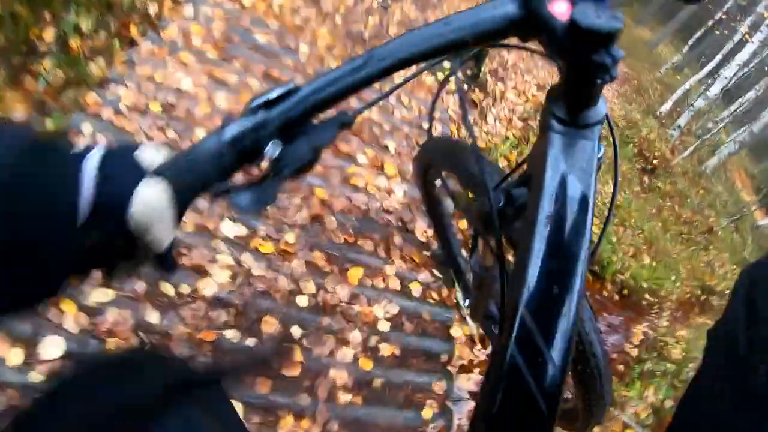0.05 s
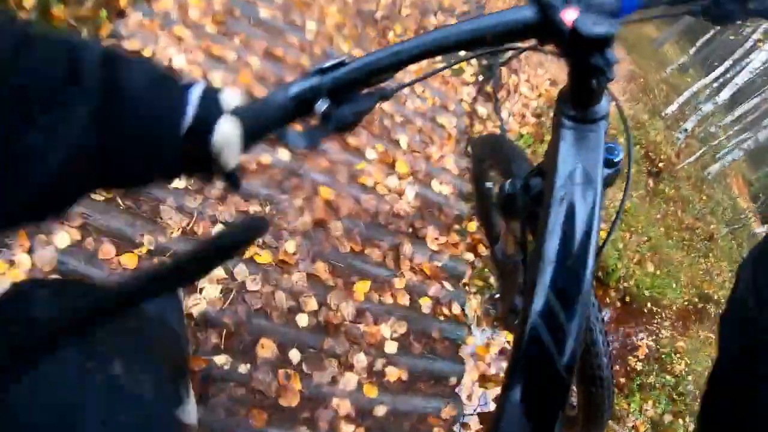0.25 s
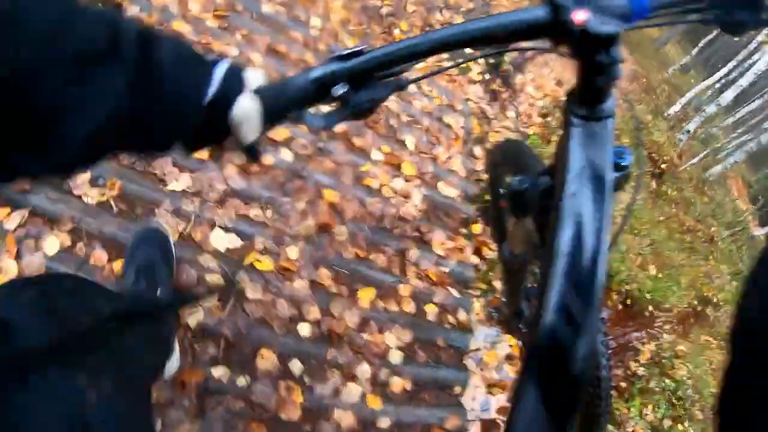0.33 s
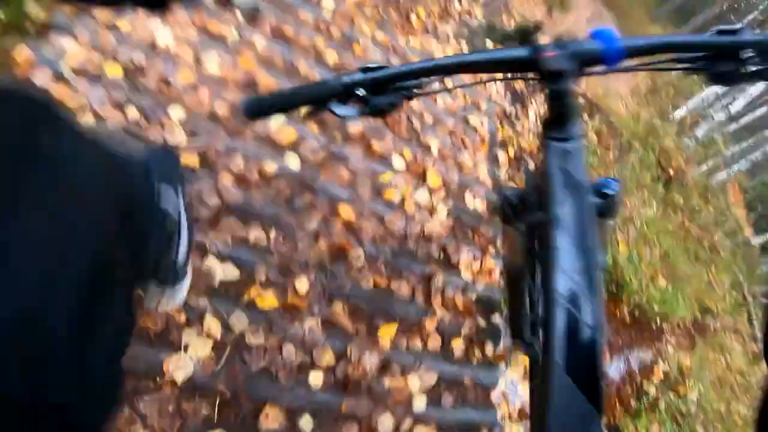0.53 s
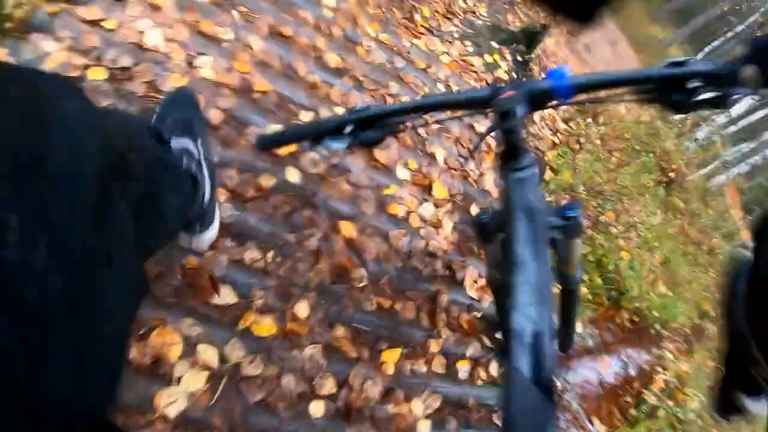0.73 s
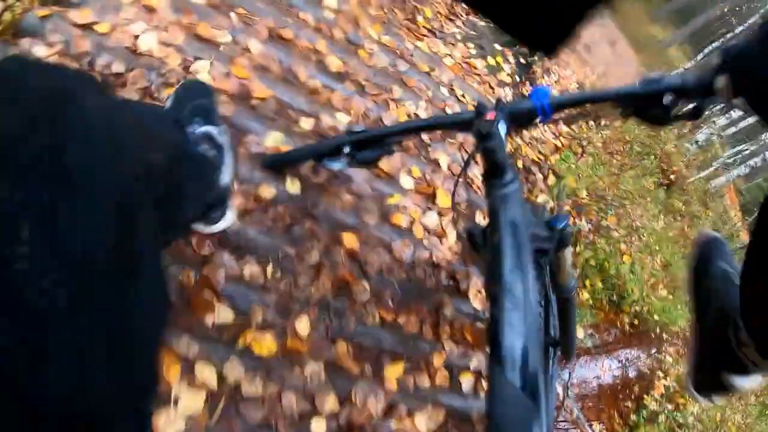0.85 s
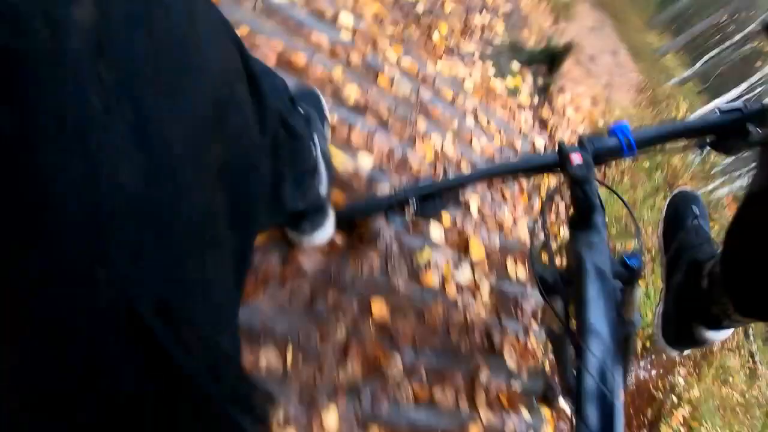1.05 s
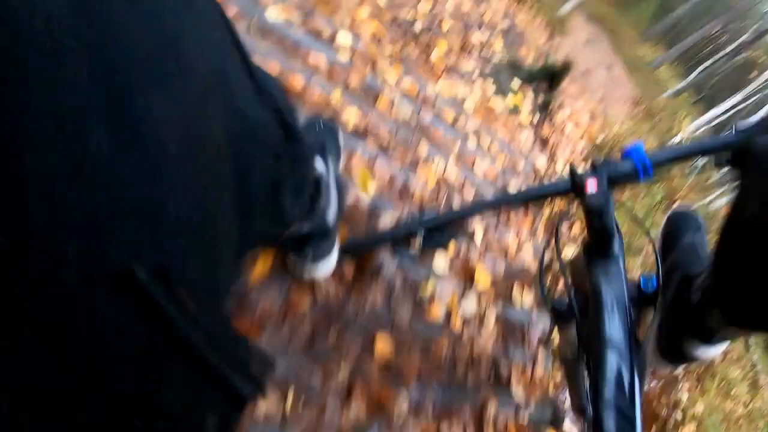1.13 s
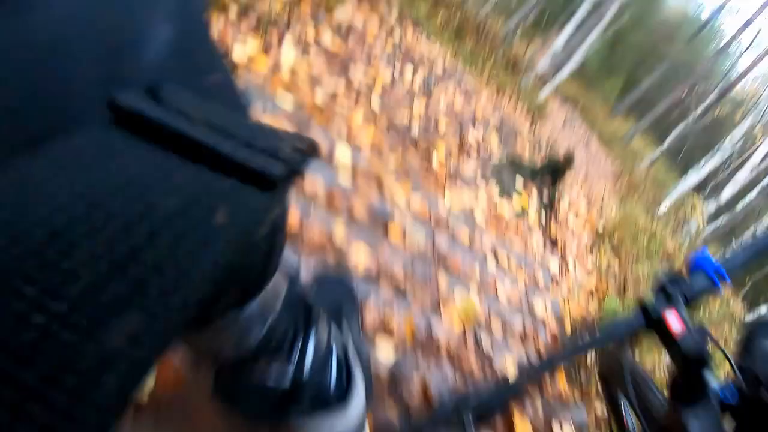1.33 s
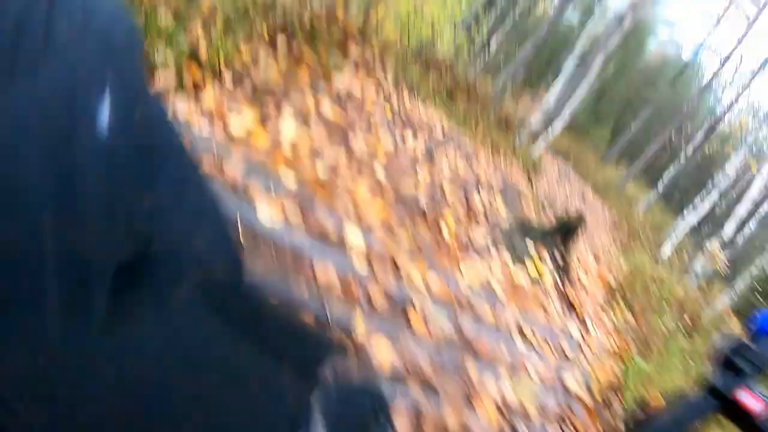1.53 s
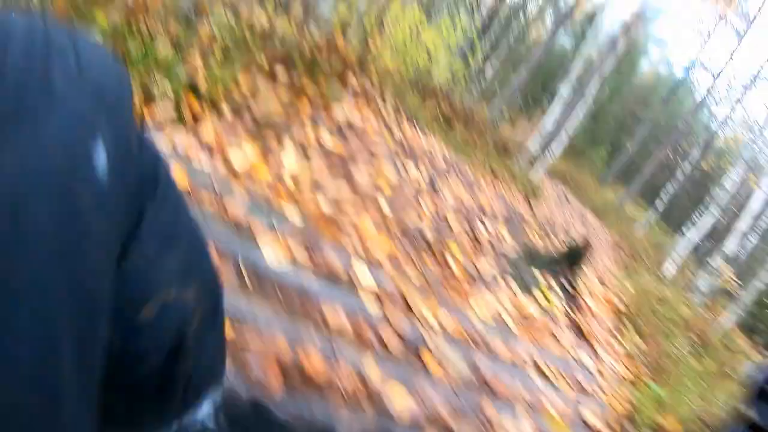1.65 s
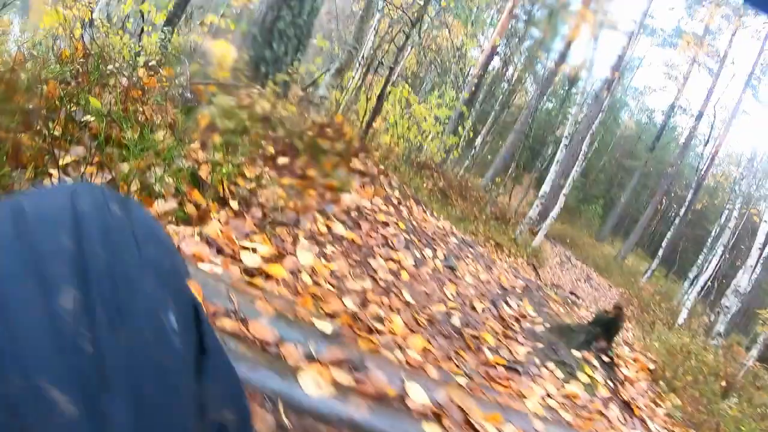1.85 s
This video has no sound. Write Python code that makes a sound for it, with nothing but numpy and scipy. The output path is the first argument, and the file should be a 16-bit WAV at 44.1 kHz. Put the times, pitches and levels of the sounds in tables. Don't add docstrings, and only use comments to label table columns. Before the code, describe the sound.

Deep, slow thuds and wooden knocks of a bike crossing leaf-covered slats, with crunch and brake rub

```python
import sys
import numpy as np
from scipy import signal
from scipy.fft import rfft, irfft, next_fast_len
from scipy.io import wavfile
from scipy.ndimage import uniform_filter1d, map_coordinates

SR = 44100
rng = np.random.default_rng(int(sys.argv[2]) if len(sys.argv) > 2 else 0)


def wav_record(signal):
    frames = np.transpose(np.atleast_2d(signal))
    bounded = np.clip(frames, -1, 1)
    quanta = np.round(bounded * 32767).astype(np.int16)
    wavfile.write(sys.argv[1], SR, quanta)


def level_to_linear(level):
    exponent = np.asarray(level, float) / 20
    return 10 ** exponent


N = 83790


def unit(x):
    return x / np.sqrt(np.mean(x ** 2) + 1e-20)


def along(points, hz):
    f, v = np.transpose(points)
    return np.interp(np.log(hz + 1), np.log(f + 1), v)


def level(rows):
    s, db = np.transpose(rows)
    return level_to_linear(np.interp(np.arange(N) / SR, s, db, left=-120))


def wobble(rate):
    knots = rng.standard_normal(int(N * rate / SR) + 4)
    return map_coordinates(knots, [np.arange(N) * rate / SR])


def filtered(x, response):
    m = next_fast_len(N + SR // 2)
    spectrum = rfft(x, m) * response(np.fft.rfftfreq(m, 1 / SR))
    return irfft(spectrum, m)[..., :N]


def body(x, modes, edge_hz):
    def response(f):
        peaks = 0
        for k, (centre, width, db) in enumerate(modes):
            peak = 1j * f * width / (centre * centre - f * f + 1j * f * width)
            peaks = peaks + (-1) ** k * level_to_linear(db) * peak
        dull = edge_hz ** 2 / (edge_hz ** 2 - f * f + 1.2j * f * edge_hz)
        return peaks * dull ** 2
    return filtered(x, response)


def grains(per_s, spread_db, noise):
    when, size, hiss = rng.random(N), rng.exponential(size=N), rng.standard_normal(N)
    taps = (when < per_s / SR) * level_to_linear(spread_db * size) * np.sign(hiss)
    return unit(unit(taps) + noise * hiss)


def even(x, span_s):
    span = round(span_s * SR)
    power = np.abs(uniform_filter1d(uniform_filter1d(unit(x) ** 2, span), span))
    return unit(x / (power + .05) ** .35)


def shaking():
    # (time [s], level [dB])
    shake_level = [(0.0, -20.5), (0.074, -31), (0.39, -15), (0.412, -25), (0.666, -15), (0.756, -16.5),
                   (0.82, -32.5), (0.92, -25), (0.984, -12), (1.152, -18.5), (1.168, -17.5), (1.312, -24.5),
                   (1.338, -23), (1.524, -31), (1.544, -27.5), (1.582, -26.5), (1.772, -33.5), (1.9, -40.5)]
    # (frequency [Hz], level [dB per Hz])
    sway_colour = [(7.1, -55), (12, -9), (26, 0), (48, 3.5), (123, -3), (160, -11), (210, -96), (350, -120)]
    # (time [s], level [dB], pitch [Hz], direction [+/-])
    thumps = [(0.182, -18.5, 137, .9), (0.29, -14, 98, -0.8), (0.374, -14, 95, -0.75),
              (0.411, -7.5, 61, -0.84), (0.448, -5.5, 110, -1.1), (.462, -7, 71, -0.75),
              (.482, -10, 24.6, 0.94), (.545, -10, 24, -0.42), (.606, -13, 140, 0.96),
              (.648, -11, 15.3, 0.52), (.692, -13, 28, -0.72), (0.748, -11, 18.7, 0.99),
              (0.963, -17, 103, -0.79), (.973, -7.5, 55, -0.88), (0.987, -5.5, 19.2, 0.85),
              (1.032, -12, 78, 0.79), (1.08, -17, 63, 0.83), (1.16, -20, 66, -0.7),
              (1.198, -7.5, 122, -0.47), (1.255, -17.5, 16, 0.6), (1.336, -10.5, 33.3, 0.74),
              (1.424, -20.5, 21, 0.82), (1.544, -16, 93, -0.8), (1.6, -21.5, 15, .9),
              (1.645, -24.5, 75, -0.63), (1.754, -27, 15, 1)]
    thump_cycles = 1.32
    sway = even(filtered(rng.standard_normal(N), lambda hz: level_to_linear(along(sway_colour, hz))), span_s=0.013)
    out = level(shake_level) * level_to_linear(-5.5 + 0.28 * wobble(17.0)) * sway
    t = np.arange(N) / SR
    for s, db, hz, way in thumps:
        cycles = np.clip(t - s, 0, None) * hz
        out = out + way * level_to_linear(db) * np.sin(2 * np.pi * cycles) * np.exp(-(cycles / thump_cycles) ** 2)
    return out


def rolling():
    # (time [s], level [dB])
    roll_level = [(0, -35), (.042, -42), (.34, -32.5), (.4, -25.5), (.448, -23), (.554, -31.5), (.66, -32),
                  (.7, -23.5), (.756, -26.5), (.804, -36), (.96, -29.5), (.988, -25), (1.142, -23),
                  (1.168, -44), (1.274, -35), (1.5, -43.5), (1.73, -42), (1.81, -39), (1.9, -42)]
    # (frequency [Hz], level [dB per Hz])
    leaves = [(130, -71), (220, -2.5), (300, -6.5), (419, -6.5), (476, -7), (581, -9.5), (1200, -12),
              (1360, -23.5), (3600, -49.5), (4680, -61), (7920, -120)]
    # (frequency [Hz], level [dB per Hz])
    rustle = [(250, -31), (520, -5), (1150, -3.5), (1600, -18.5), (3100, -34), (4600, -70)]
    # (time [s], share of rustle [0-1])
    loose_share = [
        (1.45, 0.1),
        (1.58, 0.4),
        (1.72, 0.36),
        (1.82, 0.81),
    ]
    swells = level_to_linear(.7 * wobble(22) + 1.5 * wobble(70))
    crush = swells * grains(per_s=1300, spread_db=2, noise=.9)
    heavy = even(filtered(crush, lambda hz: level_to_linear(along(leaves, hz))), span_s=0.014)
    thin = even(filtered(crush, lambda hz: level_to_linear(along(rustle, hz))), span_s=0.014)
    loose = np.clip(np.interp(np.arange(N) / SR, *np.transpose(loose_share)), 0, 1)
    return level_to_linear(-1.0) * level(roll_level) * ((1 - loose) * heavy + loose * thin)


def tyre():
    # (time [s], level [dB])
    drum_level = [(0, -44), (.17, -34.5), (.2, -29.5), (.25, -42), (.345, -22.5), (.42, -19.5), (.545, -17),
                  (.575, -21.5), (.62, -19.5), (.675, -23.5), (.715, -22.5), (.76, -35.5), (.98, -26.5),
                  (1.06, -29.5), (1.12, -37), (1.21, -24.5), (1.34, -34), (1.42, -42.5), (1.9, -54)]
    # (frequency [Hz], width [Hz], level [dB])
    tyre_modes = [(201.9, 13.8, 1.5), (167.3, 71.3, -4), (294, 16, -17)]
    knobs = grains(per_s=210, spread_db=2.5, noise=0.19)
    return level(drum_level) * even(body(knobs, tyre_modes, edge_hz=374), span_s=0.096)


def pings():
    # (time [s], peak level [dB], pitch [Hz], rise [s])
    struck = [(.2, -36, 325, 0.0074), (.309, -30, 513, 0.0037), (.34, -22.5, 403, 0.0049),
              (.378, -26, 543, 0.0022), (.41, -25.5, 1088, 0.0087), (.414, -35.5, 2080, 0.0052),
              (.432, -22.5, 620.6, 0.015), (.44, -23, 1285, 0.0057), (.468, -23.5, 1115, 0.0077),
              (.575, -33.5, 804, .012), (.607, -33, 714, 0.0057), (.625, -31, 557, 0.009),
              (.645, -38.5, 2100, 0.0049), (.684, -24, 1217, 0.0057), (.685, -19, 362.7, 0.015),
              (.691, -26, 2094, 0.0023), (.712, -37, 2140, 0.0018), (.726, -26, 2117, 0.0046),
              (.744, -28, 2150, 0.0018), (.7345, -9.5, 551, .0025), (.7355, -11.5, 1247, 0.0018),
              (.736, -15.5, 1470, 0.0012), (.736, -14, 843, 0.0016), (.742, -24, 1250, 0.0017),
              (.833, -36, 800, 0.0053), (.906, -27.5, 580, 0.0017), (.943, -41, 620, 0.0025),
              (.973, -19.5, 1192, .003), (.972, -30.5, 1850, 0.0021), (1.006, -23, 923, 0.0021),
              (1.054, -22.5, 866, 0.0024), (1.148, -16.5, 458, 0.0064), (1.187, -25.5, 1040, .004),
              (1.188, -14, 484, 0.0034), (1.24, -35.5, 1260, 0.0024), (1.276, -23.5, 1020, 0.0019),
              (1.314, -19.5, 506, 0.0042), (1.329, -29, 960, 0.0008), (1.329, -23.5, 493, .002),
              (1.035, -23.5, 843, 0.0027), (1.1, -22.5, 1176, 0.0025), (1.44, -40.5, 599, 0.013),
              (.99, -24.5, 287, 0.017), (.47, -20.5, 434.3, 0.0078), (.075, -37, 329, 0.011),
              (1.395, -46, 1090, 0.0029), (1.47, -57, 2920, 0.0013), (1.612, -54, 2840, 0.0026),
              (1.643, -38, 934, 0.0051), (1.79, -47, 1600, 0.0084)]
    s, db, hz, rise = np.transpose(struck)[..., None]
    since = np.clip(np.arange(N) / SR - s, 0, .4)
    swell = since / np.maximum(rise, .001)
    notes = level_to_linear(db) * swell * np.exp(1 - swell) * np.sin(2 * np.pi * hz * since)
    return np.sum(notes, axis=0)


def knocks():
    # (time [s], peak level [dB], length [s])
    knock_times = [(0.308, -18, 0.0055), (0.338, -17, 0.006), (0.385, -14, 0.0089), (0.427, -8, 0.016),
                   (0.467, -12, 0.013), (0.685, -12, 0.029), (0.73, -6.5, 0.0083), (0.972, -5, 0.0058),
                   (0.999, -27, 0.0064), (1.047, -12, 0.011), (1.137, -19, 0.016), (1.178, -15.5, 0.015),
                   (1.225, -19, 0.016), (1.271, -20, 0.0078), (1.3, -24, 0.0088), (1.335, -24.5, 0.013),
                   (1.376, -29, 0.013), (1.552, -31, 0.011), (1.649, -26.5, 0.012), (1.775, -34, 0.022)]
    # (frequency [Hz], width [Hz], level [dB])
    frame_modes = [(357.6, 24, 9), (430, 470, -2), (621, 98, 3), (764, 420, -17), (1075, 87, -1.5),
                   (1174, 113, -5), (1720, 560, -61)]
    rise_share, knock_db = 0.58, -14.5
    t, shape = np.arange(N) / SR, np.zeros(N)
    for s, db, length in knock_times:
        since, fade = np.clip(t - s, 0, None), max(length, .002)
        burst = (1 - np.exp(-since / (rise_share * fade))) * np.exp(-since / fade)
        shape = shape + level_to_linear(db + knock_db) * burst / burst.max()
    taps = np.sign(rng.standard_normal(N))

    def ring(x):
        return body(body(x, frame_modes, edge_hz=1580), [(840, 8100, 0)], edge_hz=3450)

    return ring(shape * taps) / np.std(ring(taps))


def chain():
    # (time [s], level [dB])
    chatter_level = [(.39, -77), (.418, -38.5), (.48, -46), (.54, -84), (.61, -55), (.65, -46),
                     (.67, -42.5), (.695, -33.5), (.73, -28), (.78, -44.5), (.96, -52.5), (1.03, -34.5),
                     (1.06, -29.5), (1.13, -39), (1.22, -60), (1.26, -47), (1.33, -46.5), (1.6, -67)]
    # (frequency [Hz], width [Hz], level [dB])
    chain_modes = [(2037, 73, -6), (2150, 200, -17.5), (2710, 140, -24), (2954, 340, -26)]
    slaps = level_to_linear(2 * wobble(60)) * grains(per_s=700, spread_db=2, noise=.8)
    return level_to_linear(-5.5) * level(chatter_level) * even(body(slaps, chain_modes, edge_hz=4000), span_s=0.032)


def snaps():
    # (time [s], peak level [dB])
    blow_times = [
        (0.7378, 2.5),
        (.9725, -18.5),
        (1.192, -40),
        (1.243, -43),
        (1.278, -38),
        (1.332, -30),
        (1.397, -31),
        (1.427, -29),
        (1.152, -48),
    ]
    # (frequency [Hz], width [Hz], level [dB])
    case_modes = [(560, 280, 4.5), (1200, 710, -5.5), (1600, 130, -28), (2326, 143, 5)]
    blows = np.zeros(N)
    for s, db in blow_times:
        blows[round(s * SR)] = level_to_linear(db + 17.5)
    return body(blows, case_modes, edge_hz=2220)


def brake():
    # (time [s], level [dB])
    rub_level = [(1.1, -52), (1.155, -27.5), (1.19, -28), (1.235, -36.5), (1.29, -30), (1.325, -22.5),
                 (1.35, -35), (1.4, -32), (1.47, -43.5), (1.5, -33.5), (1.53, -43), (1.56, -32.5),
                 (1.62, -39.5), (1.67, -51), (1.73, -48), (1.76, -50), (1.82, -38.5), (1.88, -60)]
    # (frequency [Hz], width [Hz], level [dB])
    rotor_modes = [(295, 16, -1.5), (422, 77, -1.5), (473, 36, 3.5), (1005, 29, -8.5), (2070, 40, -27),
                   (2850, 250, -31)]
    rub = level_to_linear(2 * wobble(30)) * rng.standard_normal(N)
    ringing = body(body(rub, rotor_modes, edge_hz=6700), [(600, 1220, 0)], edge_hz=5100)
    return level_to_linear(1.0) * level(rub_level) * even(ringing, span_s=0.026)


def channel_difference(mid):
    # (time [s], level [dB])
    opening = [(0, -23), (.3, -27), (.34, -3), (.41, -1), (.44, -15), (.5, 2), (.57, -15), (.62, -24),
               (.66, 5.5), (.8, 3), (.85, -26), (1.32, -30), (1.36, 8.5), (1.6, 3.5), (1.66, -7),
               (1.85, -20), (1.89, 4)]
    # (frequency [Hz], side minus mid [dB])
    turning = [(60, -41), (300, -30), (1000, -19.5), (2200, -12.5), (3200, -15), (5000, -23)]
    # (frequency [Hz], side minus mid [dB])
    airy = [(2400, -76), (2800, -15), (3400, -12), (4200, -65)]
    turn = np.exp(2j * np.pi * rng.random(200))

    def unlike(points):
        return filtered(mid, lambda hz: level_to_linear(along(points, hz)) * turn[(hz // 120).astype(int) % 200])

    return level_to_linear(-6.5) * level(opening) * unlike(turning) + unlike(airy)


def scene():
    mid = shaking() + rolling() + tyre() + pings() + knocks() + chain() + snaps() + brake()
    side = channel_difference(mid)
    return np.array([mid + side, mid - side])


def low_pass(x):
    return signal.sosfilt(signal.butter(12, 15800, fs=SR, output="sos"), x)


def record(dry):
    slow_rate_hz, top_hz = 11998, 15800
    ceiling, knee = .85, 5
    soft = dry / (1 + np.abs(dry / ceiling) ** knee) ** (1 / knee)
    held = np.floor(np.arange(N) * slow_rate_hz / SR) * SR / slow_rate_hz
    steps = np.array([map_coordinates(channel, [held]) for channel in soft])
    mix = filtered(steps, lambda hz: hz < top_hz)
    return low_pass(mix)


dry = scene()
out = record(dry)
wav_record(out)
```